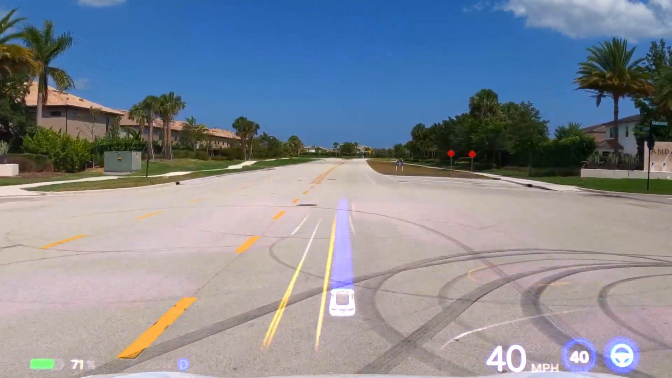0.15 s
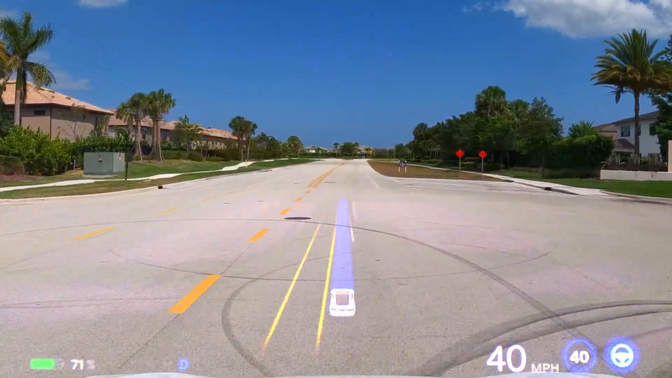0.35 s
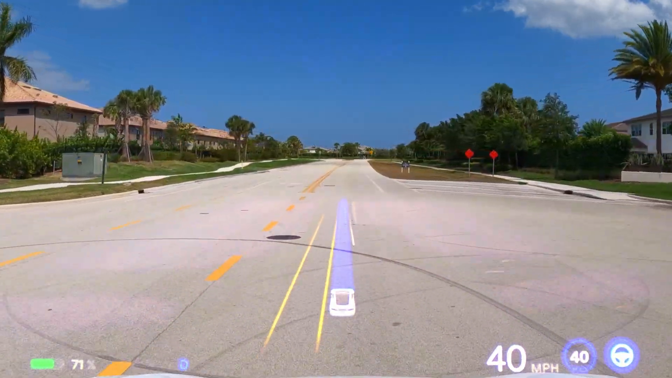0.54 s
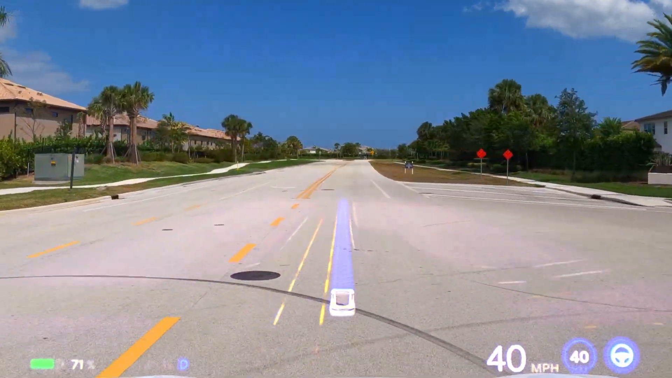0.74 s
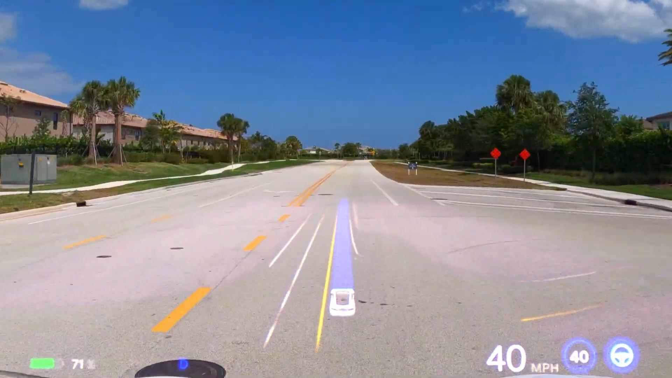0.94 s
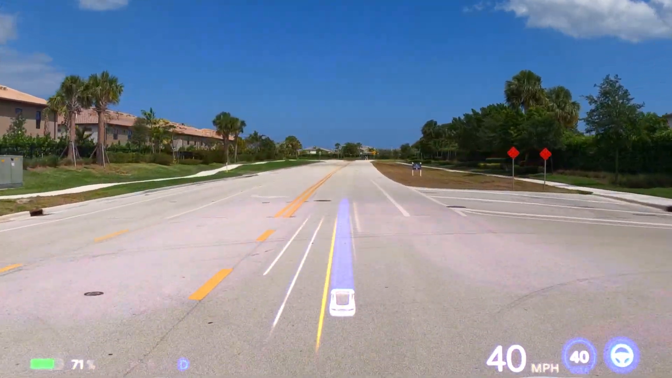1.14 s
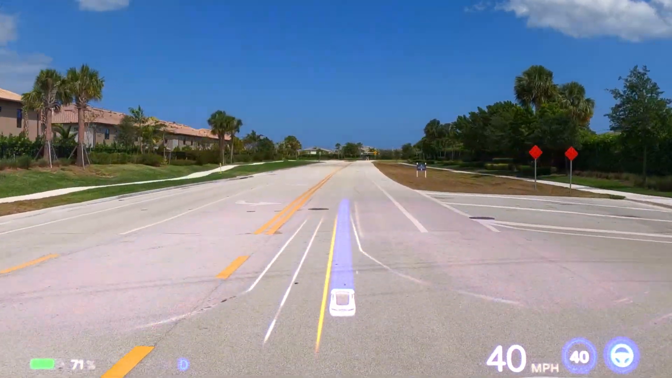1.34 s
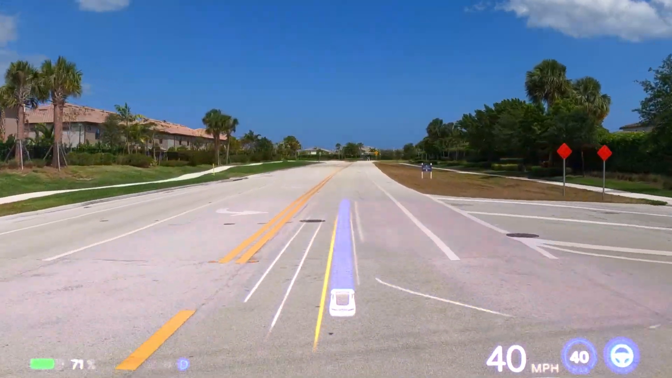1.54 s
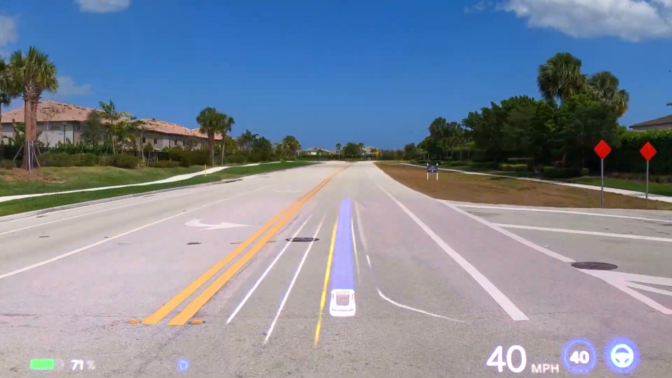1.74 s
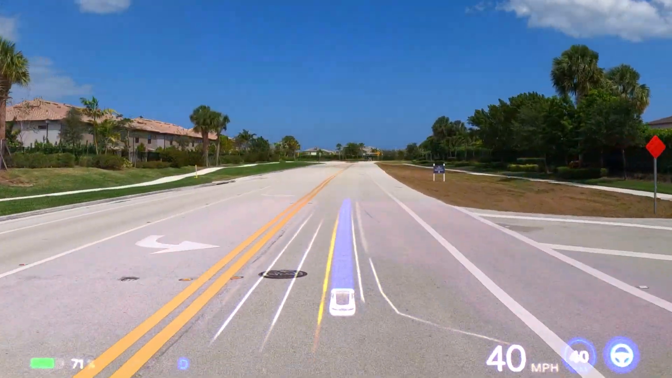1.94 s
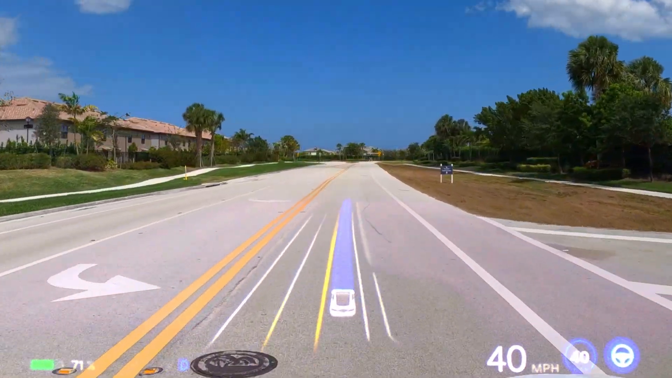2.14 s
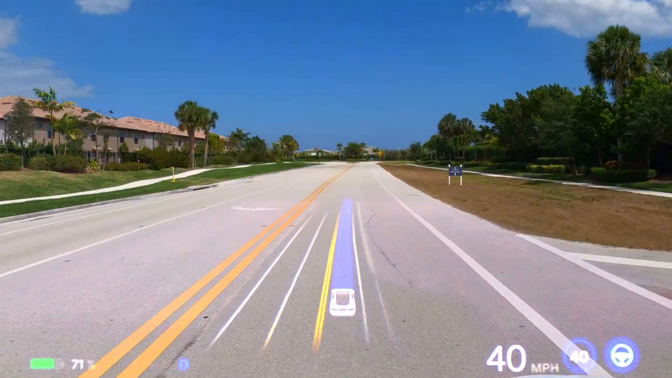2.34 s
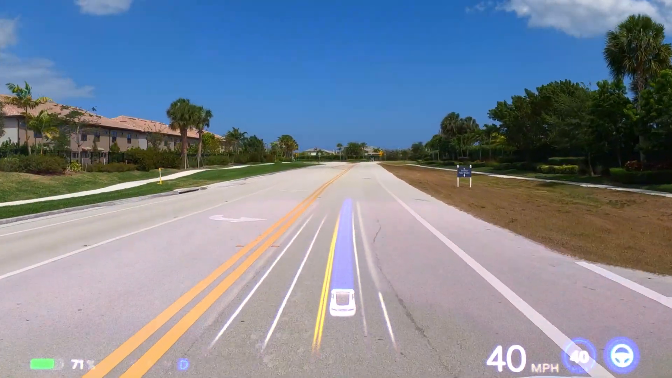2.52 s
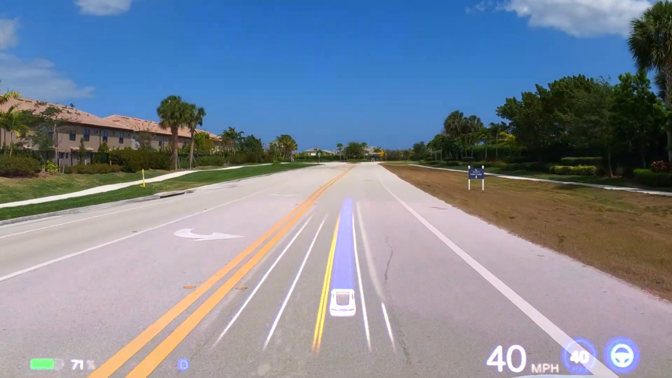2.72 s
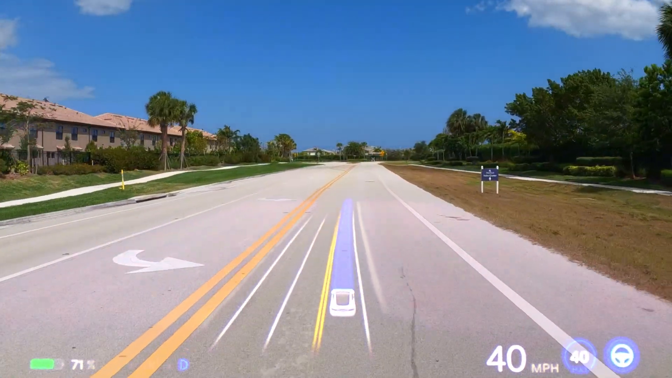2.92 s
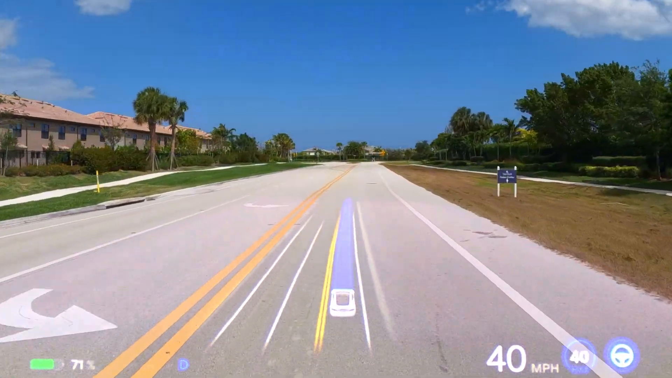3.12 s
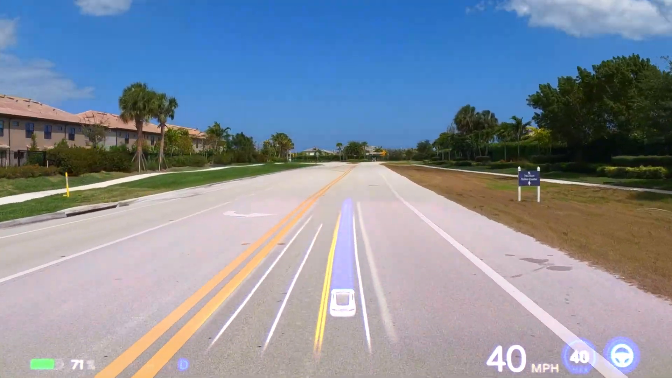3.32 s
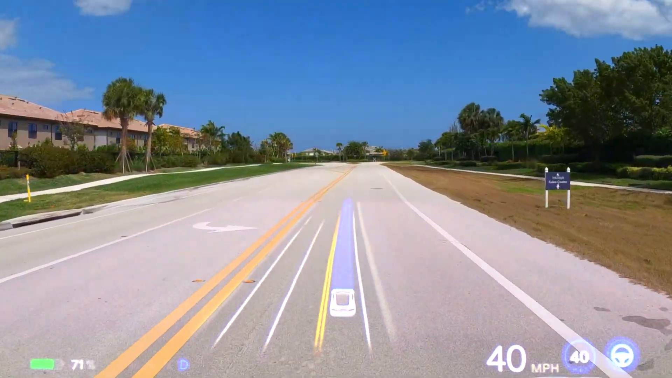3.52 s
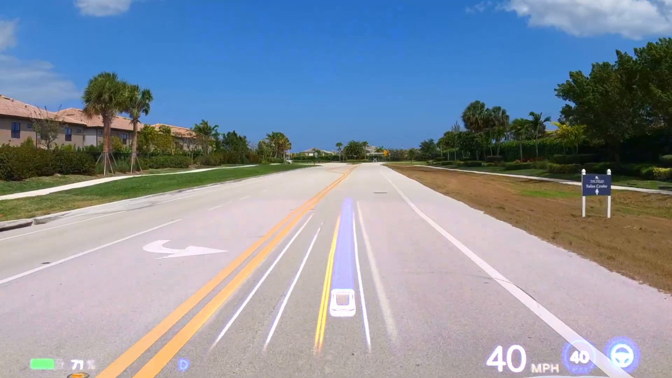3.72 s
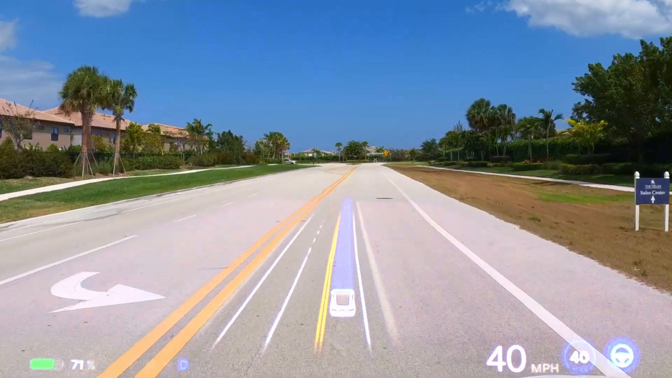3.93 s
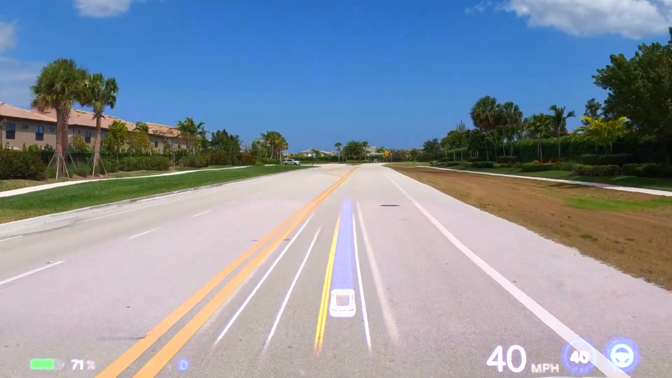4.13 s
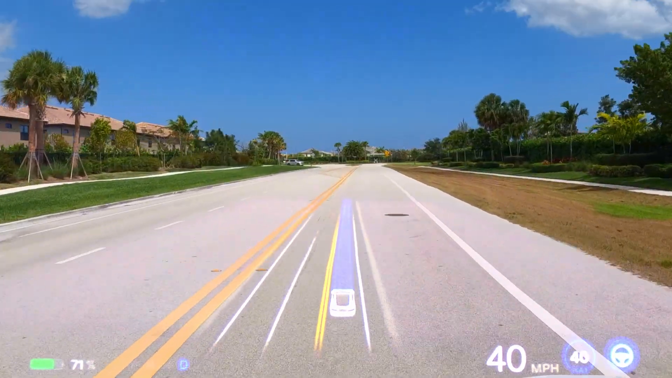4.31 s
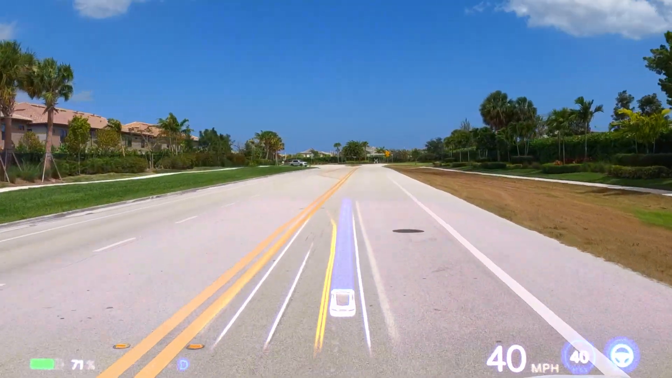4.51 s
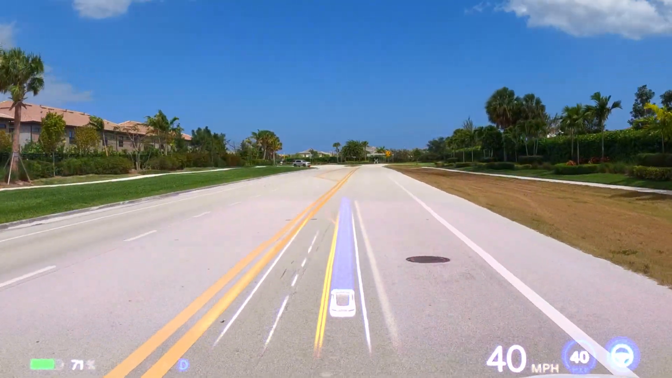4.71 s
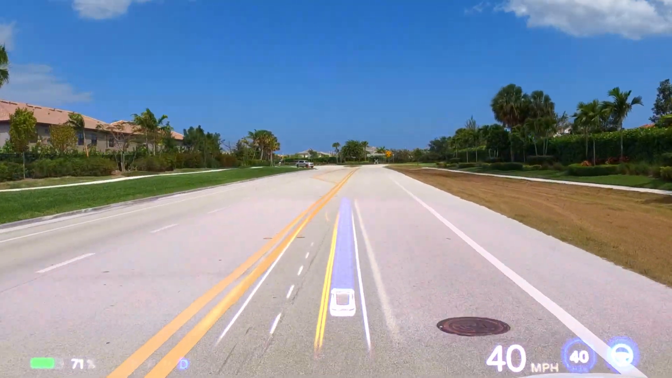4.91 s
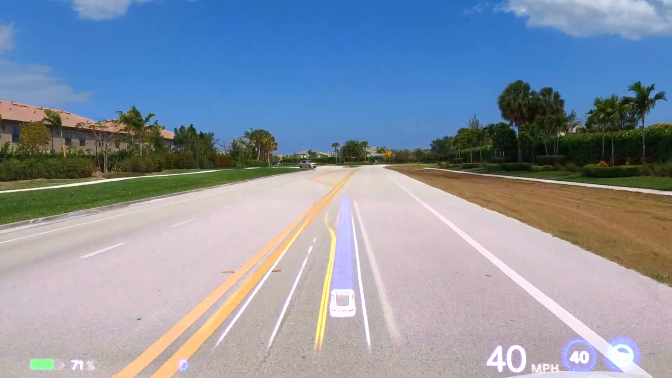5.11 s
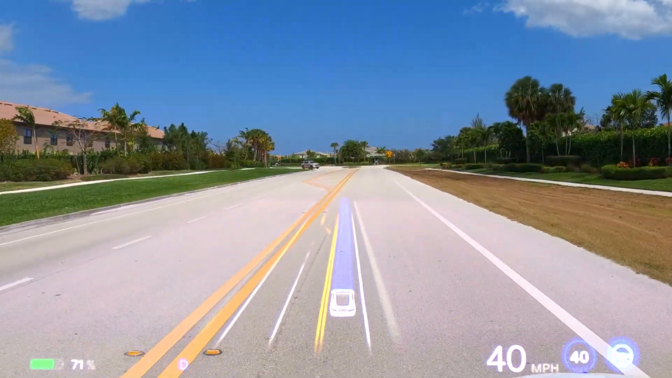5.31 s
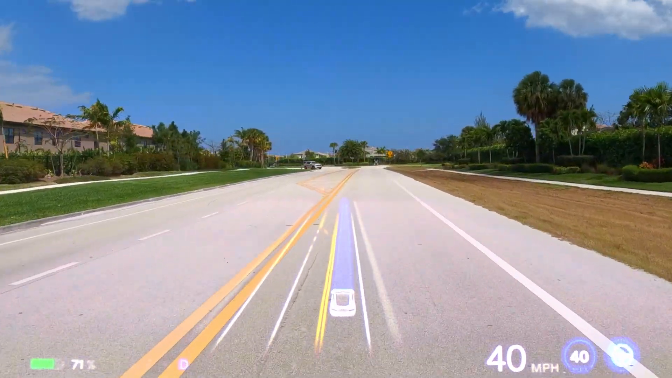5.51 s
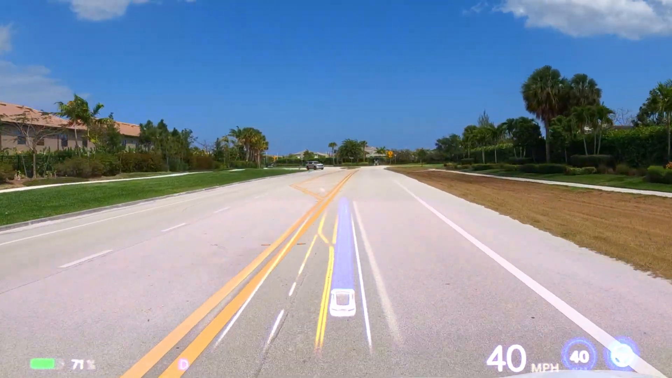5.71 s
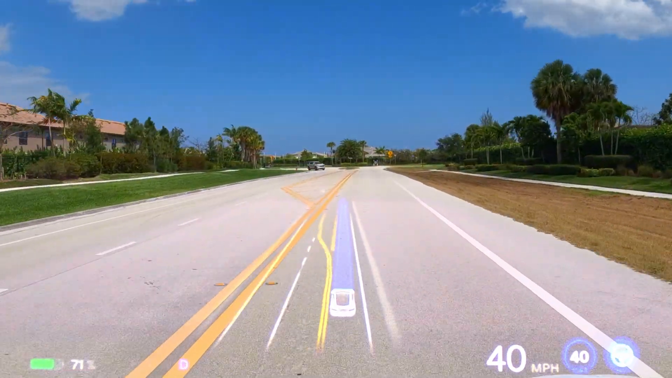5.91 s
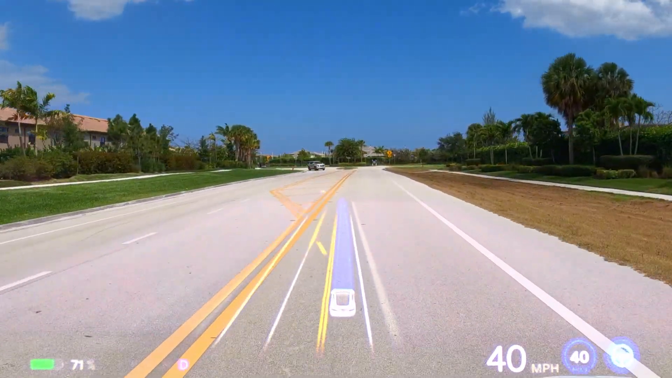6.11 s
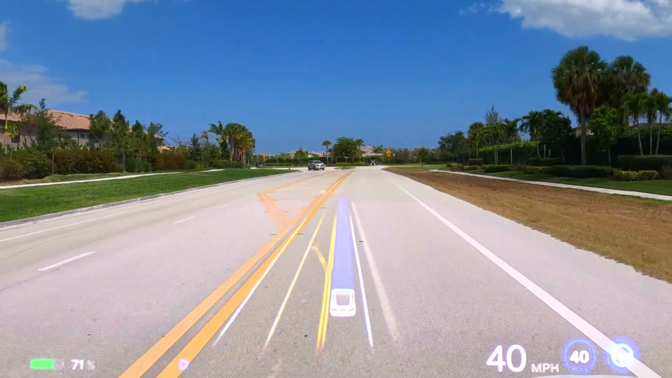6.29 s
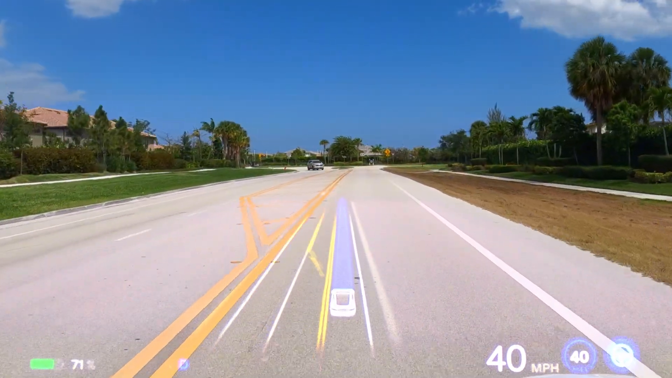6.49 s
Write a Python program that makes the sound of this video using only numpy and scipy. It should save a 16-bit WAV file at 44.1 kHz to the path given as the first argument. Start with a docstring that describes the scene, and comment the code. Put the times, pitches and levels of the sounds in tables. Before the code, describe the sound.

The sound is the closed cabin of an electric car holding a steady speed on a suburban road, heard from a microphone behind the windscreen. Deep body rumble and low cabin boom run throughout, under a dull, muffled tyre roar with a faint wavering hum around the low mids. At about 0.8 and 1.0 seconds, front then rear wheels cross a seam with soft thuds and light knocks. A dry trim tick follows at 1.1. The rumble grows rougher from 1.7 to 2.3, with a sharper knock at 2.0 and the heaviest, rounded thud near 2.2, plus small plastic ticks. Smooth cruising returns, swelling gently from 4.0. Another double bump lands at 4.8 and 5.0, with suspension rattling briefly. Then even rumble and very faint hiss continue until about 6.5 seconds.

```python
"""Road rumble inside an electric car at steady speed: uneven asphalt rings the body and cabin air modes.
Tread noise and belt resonances roar dully through the closed windows.
Axles cross a few seams, front then rear: decaying modes thud, tread scuffs, suspension and arch ring.
Noise bursts make the trim tick and rustle; glass echoes and a faint even hiss complete the cabin."""
import sys
import numpy as np
from scipy import signal
from scipy.fft import rfft, irfft, next_fast_len
from scipy.io import wavfile
from scipy.ndimage import uniform_filter1d, map_coordinates

SR = 44100
rng = np.random.default_rng(int(sys.argv[2]) if len(sys.argv) > 2 else 0)


def transcribe(u):
    """Save the signal u as a 16-bit wav file named by the first command-line argument.

    u: samples, shape (n,) or (channels, n), limited to [-1, 1]; the rate is SR.
    q: integer samples, one column per channel.
    """
    v = np.clip(np.atleast_2d(u).T, -1, 1)
    q = np.round(v * 32767).astype(np.int16)
    wavfile.write(sys.argv[1], SR, q)


N = 288855

# Air and microphone hiss spectrum: (frequency [Hz], relative density [dB])
HISS_SPECTRUM = [(300, -9), (3000, -2), (5000, -1.5), (8000, -4), (11000, -6), (13500, -10), (15600, -16)]
# Plastic trim ticks: (time [s], relative level [dB], low edge [Hz], high edge [Hz], t60 [s])
TRIM_TICKS = [(0.572, -67, 6600, 7900, .025), (1.1398, -42.5, 850, 1900, .017),
              (1.802, -64, 1400, 3200, .13), (1.891, -55, 900, 2100, .07), (2.233, -47, 900, 3200, .045),
              (2.237, -64.5, 2000, 7500, .2), (5.004, -54, 1100, 1900, .03)]
# Trim rubbing on its clips: (frequency [Hz], relative density [dB])
CHAFE_SPECTRUM = [(600, -22), (1800, 3), (3300, -7.5), (5500, -8.5), (12000, -27)]
# Suspension and wheel arch modes: (frequency [Hz], relative level [dB], t60 [s])
ARCH_MODES = [(251, -5, 0.059), (330, -5, 0.029), (417, -3, .05), (480, -8, 0.026), (567, -2.5, 0.029),
              (707, -3, 0.02), (897, -1.5, 0.042), (1215, -12.5, 0.031), (1660, -24, 0.03)]
# Sharp edges knocking the suspension: (time [s], level [dB], brightness [dB/octave])
EDGE_KNOCKS = [(0.843, -47, -5), (1.024, -44, 2), (1.995, -37, 4), (2.019, -36.5, -3), (2.040, -38, -6),
               (2.169, -40.5, 0), (2.184, -42.5, -3.5), (2.203, -43.5, -5), (4.793, -48, 4),
               (4.818, -43, -1), (4.844, -39.5, -5), (4.861, -45, -10), (4.989, -38.5, -2),
               (5.022, -44.5, -7)]
# Tread slapping an edge: (frequency [Hz], relative density [dB])
SLAP_SPECTRUM = [(150, -22), (300, 4.5), (450, 9.5), (640, -3), (780, 0.5), (920, -3), (1060, -2.5),
                 (1250, -12), (1600, -12), (2500, -33), (5000, -44), (12000, -60.5)]
# Axle crossing a seam, all levels relative: (time [s], boom [dB], tyre ring [dB], hop [s],
# landing boom [dB], landing ring [dB], scuff [dB], trim rustle [dB])
AXLE_CROSSINGS = [(0.830, -24, -32, 0.026, -22.5, -39, -52, -82),
                  (1.003, -22, -35, 0.054, -17.5, -48, -50.5, -95),
                  (1.991, -33, -34, 0.03, -30, -29, -45.5, -76.5),
                  (2.166, -22, -28.5, 0.060, -11.5, -35, -44, -77.5),
                  (4.815, -29.5, -23, 0.045, -23.5, -22, -45.5, -89),
                  (4.987, -27.5, -33.5, 0.064, -21, -40, -47, -75.5)]
# Asphalt coarseness: (time [s], relative tyre level [dB])
ASPHALT_GRIT = [(0.0, -56.5), (1.6, -57), (2.13, -54), (2.32, -58), (5.0, -57), (6.55, -57.5)]
# Tread noise through the doors: (frequency [Hz], relative density [dB])
TREAD_SPECTRUM = [(120, -21.5), (250, 0), (320, -5), (540, -5), (690, -8.5), (800, -8.5), (930, -8.5),
                  (1030, -16), (1120, -12.5), (1330, -19.5), (1500, -19), (1950, -24.5), (2300, -28.5),
                  (3200, -35), (12000, -74.5)]
# Tyre belt resonances: (frequency [Hz], half-width at -6 dB [Hz], relative level [dB])
BELT_MODES = [(371, 40, -5), (407.5, 5.4, 0.5), (439, 12.6, -3)]
# Body on its suspension: (frequency [Hz], half-width at -6 dB [Hz], relative level [dB])
BODY_MODES = [(28.47, 3.9, 1.5), (35.1, 10, -6), (47.27, 4.4, -2.5)]
# Cabin air, panels, air ring inside the tyres:
# (frequency [Hz], half-width at -6 dB [Hz], relative level [dB])
CABIN_MODES = [(75.4, 21.5, 0.5), (91.3, 15.4, -2), (123.7, 21.2, 1.5), (178.4, 10.3, -13),
               (201.9, 20.6, -10.5), (268, 21, -21.5)]
# Stretches of uneven road: (start [s], length [s], extra shake [dB], extra boom [dB])
ROUGH_PATCHES = [(0.1, 0.18, -0.5, 5), (0.885, 0.23, 10.5, 2.5), (1.298, 0.26, 6, 4), (1.71, 0.6, 8, 6.5),
                 (4.054, 0.79, 3.5, 1.5), (4.807, 0.24, 10.5, 9)]

SHAKE_DB, BOOM_DB = -37.5, -42.5  # rms on smooth asphalt
BUILD_S, BODY_SETTLE_S, CABIN_SETTLE_S = 0.033, 0.17, 0.047  # time constants
KICK_DB = -31.5  # body kick at 45 Hz, alike for every blow
TOP_HZ = 15700  # microphone band limit


def amp(db):
    """Decibels to gain."""
    return 10 ** (np.asarray(db) / 20)


def unit(x):
    """Scale to rms 1."""
    return x / np.sqrt(np.mean(x ** 2) + 1e-20)


def along(points, hz):
    """Interpolate (frequency [Hz], value) points on a log axis."""
    f, v = np.transpose(points)
    return np.interp(np.log(hz + 1), np.log(f + 1), v)


def curves(rows):
    """One value per sample for each column after the time."""
    times_s, *columns = np.transpose(rows)
    return [np.interp(np.arange(N) / SR, times_s, column) for column in columns]


def wobble(rate_hz):
    """Smooth random curve with rate_hz knots a second."""
    knots = rng.standard_normal(int(N * rate_hz / SR) + 4)
    return map_coordinates(knots, [np.arange(N) * rate_hz / SR])


def filtered(x, response):
    """Multiply the spectrum of x by a response of frequency."""
    m = next_fast_len(N + SR // 2)
    hz = np.fft.rfftfreq(m, 1 / SR)
    return irfft(rfft(x, m) * response(hz), m)[..., :N]


def coloured(spectrum):
    """Noise of rms 1 with a given spectrum."""
    return unit(filtered(rng.standard_normal(N), lambda hz: amp(along(spectrum, hz))))


def band(lo_hz, hi_hz):
    """Noise of rms 1 between two edges."""
    def edges(f):
        low_cut = 1 + (f / lo_hz) ** 8
        high_cut = 1 + (f / hi_hz) ** 10
        return (f / lo_hz) ** 4 / np.sqrt(low_cut * high_cut)
    return unit(filtered(rng.standard_normal(N), edges))


def resonant(modes):
    """Noise of rms 1 shaped by steep-sided resonances."""
    def response(f):
        power = sum(amp(2 * db) / (1 + ((f - hz) / width_hz) ** 2) ** 2 for hz, width_hz, db in modes)
        return np.sqrt(power)
    return unit(filtered(rng.standard_normal(N), response))


def sustained(x, size):
    """Hold the power of x near 1, averaged twice over size samples."""
    power = uniform_filter1d(uniform_filter1d(x ** 2, size), size)
    return x / np.sqrt(np.abs(power) + 1e-9)


def blow(start_s, rise_s, t60_s):
    """Envelope of peak 1 that swells from start_s and dies away."""
    t = np.maximum(np.arange(N) / SR - start_s, 0)
    decay = amp(-60 * np.minimum(t / t60_s, 2)) * (t < 2 * t60_s)
    shape = (1 - np.exp(-t / rise_s)) * decay
    return shape / (shape.max() + 1e-12)


def hiss(level_db):
    """Even noise of air and microphone."""
    return amp(level_db) * coloured(HISS_SPECTRUM)


def glass_echoes(x, echo_db, t60_s):
    """Dense reflections from glass and dashboard ripple the spectrum."""
    t = np.arange(SR // 8) / SR
    tail = rng.standard_normal(len(t)) * amp(-60 * t / t60_s) * (t > .001)
    echoes = signal.fftconvolve(x, tail / np.linalg.norm(tail))[:N]
    return x + amp(echo_db) * filtered(echoes, lambda hz: hz ** 4 / (hz ** 4 + 600 ** 4))


def chafe(level_db, grain_db, rise_s, t60_s):
    """Trim rubs on its clips around each crossing, in noise grains of limited level swing."""
    shaking = sum(amp(rustle_db + level_db) * blow(s, rise_s, t60_s)
                  for s, *_, rustle_db in AXLE_CROSSINGS)
    grains = amp(grain_db * np.tanh(wobble(130)))
    return shaking * grains * coloured(CHAFE_SPECTRUM)


def trim(level_db, rise_s):
    """Plastic panels tick as short bursts of band noise."""
    return sum(amp(db + level_db) * blow(s, rise_s, t60_s) * band(lo_hz, hi_hz)
               for s, db, lo_hz, hi_hz, t60_s in TRIM_TICKS)


def knocks(rise_s, scatter_db, pivot_hz, detune):
    """Each knock rings the arch a little differently; brightness tilts its modes about pivot_hz."""
    out, t = np.zeros(N + SR), np.arange(SR // 8) / SR
    hz, mode_db, t60_s = np.transpose(ARCH_MODES)[:, :, None]
    for s, db, brightness in EDGE_KNOCKS:
        tilt_db = brightness * np.log2(hz / pivot_hz)
        level_db = db + mode_db + tilt_db + scatter_db * rng.standard_normal(hz.shape)
        pitch_hz = hz * (1 + detune * rng.standard_normal(hz.shape))
        tone = np.sin(2 * np.pi * (pitch_hz * t + rng.random(hz.shape)))
        ring = amp(level_db - 60 * t / t60_s) * tone
        out[round(s * SR):][:len(t)] += ring.sum(axis=0) * (1 - np.exp(-t / rise_s))
    return out[:N]


def slaps(level_db, rise_s, t60_s, rough_db):
    """Tread scuffs roughly while its contact patch rolls across an edge."""
    contact = sum(amp(scuff_db + level_db) * blow(s, rise_s, t60_s)
                  for s, *_, scuff_db, _ in AXLE_CROSSINGS)
    roughness = amp(rough_db * np.tanh(wobble(140)))
    return contact * unit(roughness * coloured(SLAP_SPECTRUM))


def wheel_blows():
    """Each axle strikes a seam, hops and lands: (time [s], boom [dB], tyre ring [dB])."""
    rows = []
    for s, boom_db, ring_db, hop_s, landing_boom_db, landing_ring_db, *_ in AXLE_CROSSINGS:
        rows += [(s, boom_db, ring_db), (s + hop_s, landing_boom_db, landing_ring_db)]
    return rows


def thuds(boom_offset_db, ring_offset_db, damping, rise_s):
    """Each blow kicks the body and cabin modes; wider modes die sooner."""
    out, t = np.zeros(N + SR), np.arange(SR // 2) / SR
    modes, blows = BODY_MODES + CABIN_MODES, wheel_blows()
    phases = rng.uniform(0, 2 * np.pi, (len(blows), len(modes)))
    for (s, boom_db, ring_db), blow_phases in zip(blows, phases):
        # (frequency [Hz], force [dB])
        force = [(45, KICK_DB), (120, boom_db + boom_offset_db), (200, ring_db + ring_offset_db)]
        for (hz, width_hz, db), phase in zip(modes, blow_phases):
            fade = np.exp(-damping * width_hz * t) * (1 - np.exp(-t / rise_s))
            tone = np.sin(2 * np.pi * hz * t + phase)
            out[round(s * SR):][:len(t)] += amp(db + along(force, hz)) * fade * tone
    return out[:N]


def tyres(roar_db, belt_db, flutter_db, waver_db):
    """Tread blocks patter on the asphalt and set the belts humming unevenly."""
    grit_db = curves(ASPHALT_GRIT)[0] + flutter_db * wobble(22)
    tread = coloured(TREAD_SPECTRUM)
    belt = unit(amp(waver_db * wobble(9)) * resonant(BELT_MODES))
    return amp(grit_db) * (amp(roar_db) * tread + amp(belt_db) * belt)


def unevenness(settle_s):
    """Extra shake and boom [dB], never below 0: each stretch builds up, holds and settles."""
    t = np.arange(N) / SR
    extra_db = np.zeros((2, N))
    for s, length_s, *gain_db in ROUGH_PATCHES:
        attack = 1 - np.exp(-np.maximum(t - s, 0) / BUILD_S)
        release = np.exp(-np.maximum(t - s - length_s, 0) / settle_s)
        extra_db = np.maximum(extra_db, np.outer(gain_db, attack * release))
    return extra_db


def rumble():
    """Road unevenness keeps the body and the cabin air ringing."""
    shake_db = SHAKE_DB + unevenness(BODY_SETTLE_S)[0]
    boom_db = BOOM_DB + unevenness(CABIN_SETTLE_S)[1]
    body = amp(shake_db) * sustained(resonant(BODY_MODES), size=SR // 7)
    cabin = amp(boom_db) * sustained(resonant(CABIN_MODES), size=SR // 8)
    return body + cabin


def scene():
    """Sum all sources at one microphone behind the windscreen; rumble, thuds and hiss get no echoes."""
    fittings = trim(level_db=-6.5, rise_s=0.00068)
    fittings = fittings + chafe(level_db=4.5, grain_db=6, rise_s=0.099, t60_s=0.51)
    edges = slaps(level_db=-1.5, rise_s=0.0093, t60_s=0.25, rough_db=2.5)
    edges = edges + knocks(rise_s=0.0016, scatter_db=2.0, pivot_hz=704, detune=0.048)
    thud = thuds(boom_offset_db=-3, ring_offset_db=3.5, damping=1.42, rise_s=0.013)
    road = tyres(roar_db=3.0, belt_db=3.5, flutter_db=0.69, waver_db=1.6)
    inside = glass_echoes(road + edges + fittings, echo_db=-15, t60_s=.14)
    return (rumble() + thud + inside + hiss(level_db=-75.0))[None]


def record(dry, low_hz=19):
    """The microphone sheds the deepest bass and keeps nothing above its band limit."""
    def response(hz):
        return (hz < TOP_HZ) * hz ** 4 / np.sqrt(hz ** 8 + low_hz ** 8)
    return filtered(dry, response)


dry = scene()
out = record(dry)
transcribe(out)
```